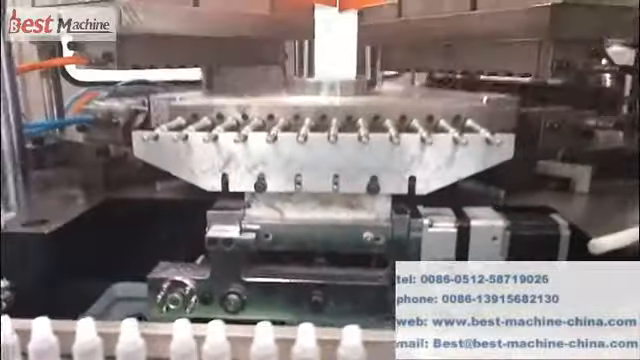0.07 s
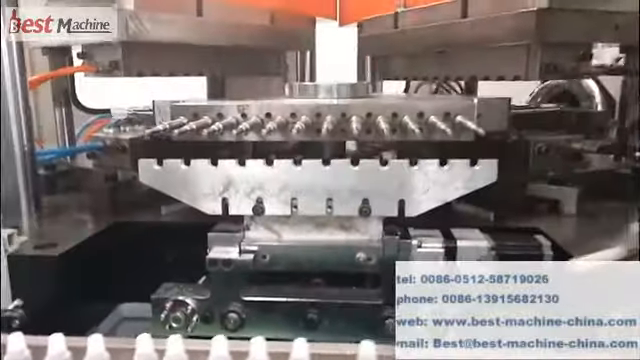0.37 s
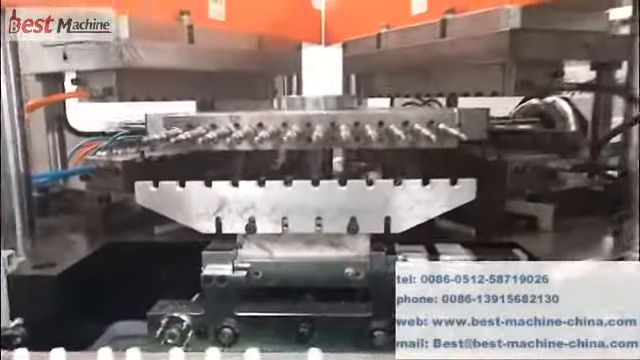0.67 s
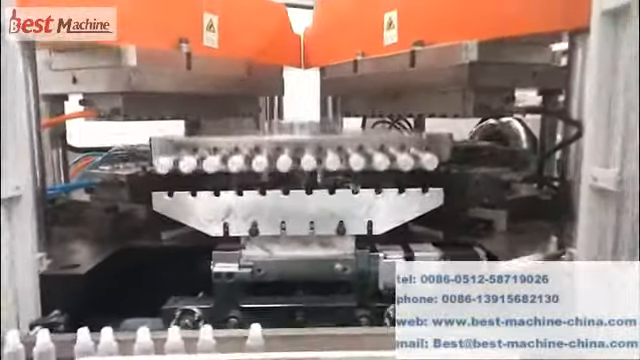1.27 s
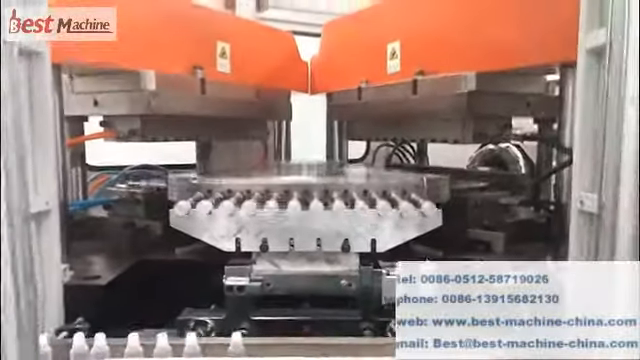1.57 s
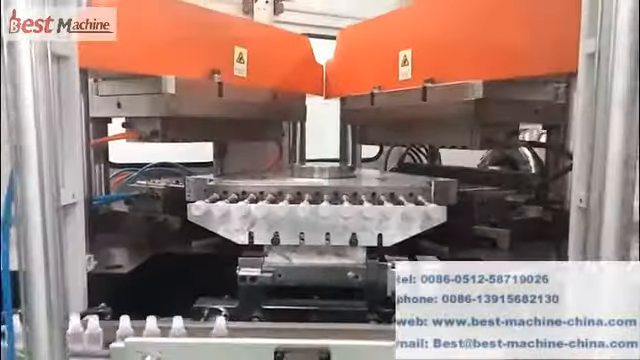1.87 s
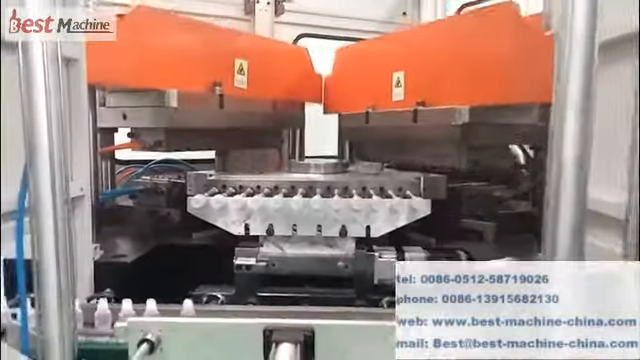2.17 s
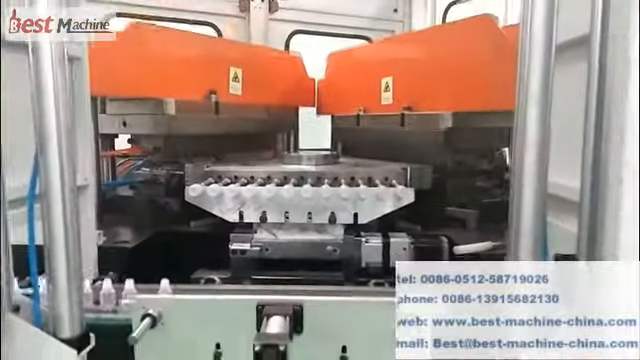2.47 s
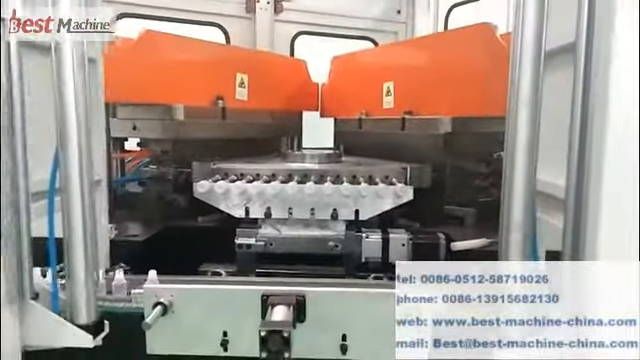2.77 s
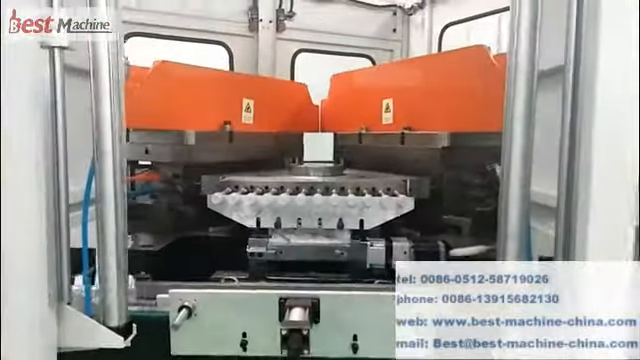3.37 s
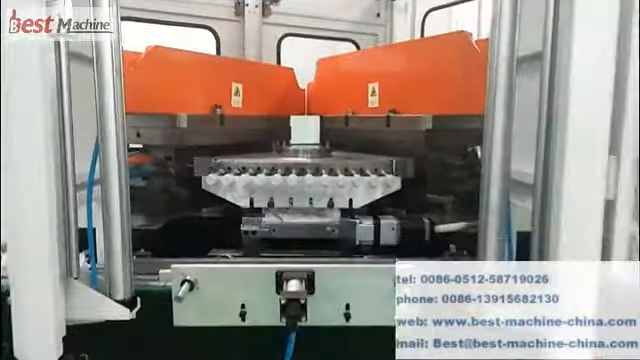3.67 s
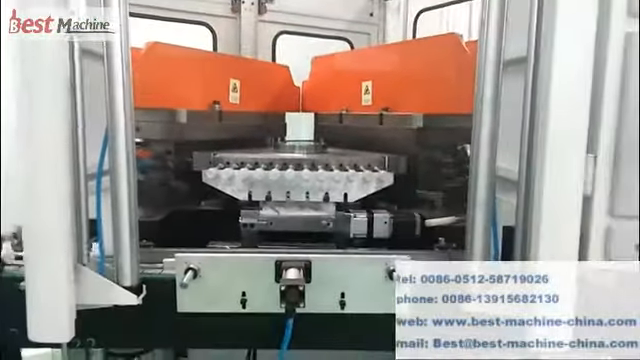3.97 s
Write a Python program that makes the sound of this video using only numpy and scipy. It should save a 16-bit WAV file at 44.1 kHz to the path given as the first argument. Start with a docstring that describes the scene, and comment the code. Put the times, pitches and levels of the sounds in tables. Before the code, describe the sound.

A molding machine cycles with thumps, steel clanks and air bursts in a rumbling factory.

```python
"""A blow molding machine cycles in a loud factory hall, heard from just in front of its open guard.
The mold carriage thuds, booms and knocks against its stops; steel parts clank and the linkage ticks.
Pneumatic valves dump air in bursts that die away in the hall, and a drive hums through one stroke.
Pump motors and the din of other machines lie underneath; the guard's panels colour it all."""
import sys
import numpy as np
from scipy import signal
from scipy.fft import rfft, irfft
from scipy.io import wavfile

SR = 44100
rng = np.random.default_rng(int(sys.argv[2]) if len(sys.argv) > 2 else 0)


def digitize_waveform(pressure):
    """Quantize a signal to 16-bit integers and store it at the path in sys.argv[1].

    Rows of a 2-D input are taken as channels; values are limited to [-1, 1].
    """
    field = np.atleast_2d(pressure).T
    bounded = np.clip(field, -1, 1)
    quanta = np.round(bounded * 32767).astype(np.int16)
    wavfile.write(sys.argv[1], SR, quanta)


N = 176400
TIME, BINS_HZ = np.arange(N) / SR, np.fft.rfftfreq(N, 1 / SR)


def carriage(rise_s=0.0095):
    """Each carriage move shakes the frame and booms a panel."""
    # moves: t/s, level/dB, hold/s, t60/s, boom f/Hz, glide/(Hz/s), boom/dB
    thuds = [(0.044, -22, 0.04, 0.34, 283, 35, 17), (0.158, -25, 0.047, 0.21, 305, -200, -7),
             (0.24, -19, 0.042, 0.24, 364.5, -550, 13.5), (0.402, -20, 0.033, 0.27, 367, -300, 2),
             (0.482, -24, 0.018, 0.2, 370, -1, 5.5), (0.878, -18.5, 0.076, 0.63, 440, 202, -8.5),
             (1, -18, .05, 0.31, 439, -600, -12), (1.042, -20, 0.11, 0.69, 349.2, -450, -3),
             (1.241, -25, 0.11, 0.57, 457, 1, 4.5), (1.804, -20, 0.058, 0.11, 385, 0, -2),
             (1.874, -18, 0.038, 0.37, 390, 306, -3), (2.362, -26.5, 0.074, 0.23, 412, 4, -7),
             (3.35, -27.5, 0.19, 0.53, 443.3, -90, 1.5), (3.851, -28.5, 0.067, 0.3, 273, 5, 0)]
    # frame spectrum: f/Hz, level/dB
    frame = [(20, -58), (60, -28), (130, -5.5), (240, 7), (430, 6), (560, -1), (750, -5.5), (1100, -5.5),
             (1800, -26), (3000, -40), (5000, -70.5), (15000, -92.5)]
    out = np.zeros(N)
    for start, db, hold, t60, hz, glide, boom_db in thuds:
        body = colour(rattle(), spectrum(frame)) + amp(boom_db) * boom(start, hz, glide)
        out += amp(db) * unit(body) * envelope(start, rise_s, hold, t60)
    return out


def boom(start_s, hz, glide_hz_per_s, glide_s=0.25, roughness=0.49, rough_hz=49):
    """A panel rings unsteadily, its pitch sliding with the speed of the carriage."""
    pitch_hz = hz + glide_hz_per_s * np.clip(TIME - start_s, 0, glide_s)
    swing = 1 + roughness * (wander(rough_hz) + 1j * wander(rough_hz))
    phase = 2 * np.pi * (np.cumsum(pitch_hz) / SR + rng.random())
    return unit((swing * np.exp(1j * phase)).real)


def mold_stops(rise_s=0.002):
    """The mold knocks against its hard stops."""
    # knocks: t/s, level/dB, hold/s, t60/s
    knocks = [(0.174, -22.5, 0.0085, 0.21), (1.787, -23, 0.013, 0.41), (2.466, -25, .02, 0.19),
              (3.261, -13.5, 0.006, 0.05), (3.279, -20, 0.011, 0.16), (3.934, -21, 0.0058, 0.16)]
    # knock spectrum: f/Hz, level/dB
    body = [(20, -42.5), (70, -36.5), (160, -3.5), (400, 6), (620, -2.5), (900, -1), (1450, -7),
            (2500, -17.5), (4000, -35.5), (5500, -68), (15000, -71.5)]
    return sum(amp(db) * colour(rattle(), spectrum(body)) * envelope(start, rise_s, hold, t60)
               for start, db, hold, t60 in knocks)


def bed_shudders(rise_s=0.0097):
    """The machine bed shudders in narrow, deep bands of noise."""
    # shudders: t/s, level/dB, hold/s, t60/s, f/Hz
    shudders = [(0.168, -45.5, .04, 0.36, 76), (0.428, -36.5, 0.21, 0.94, 128.4), (1.85, -40, .1, 0.65, 91),
                (2.326, -45, 0.074, 0.26, 64.6), (2.445, -43, .02, .25, 68.7),
                (3.27, -35, 0.014, 0.31, 133)]
    return sum(amp(db) * noise(resonance(hz, 54) ** 2) * envelope(start, rise_s, hold, t60)
               for start, db, hold, t60, hz in shudders)


def clanks():
    """Steel parts chatter against each other and ring."""
    # hits: t/s, level/dB, rise/s, hold/s, t60/s, ring/dB, clatter f/Hz, clatter/dB
    hits = [(-.01, -20.5, .007, 0.018, 1, -6, 1580, -2.5), (0.702, -25, .007, .04, 0.79, -23, 2200, -3),
            (1.06, -30, .007, 0.1, 0.6, -13, 2220, -2.5), (1.433, -25.5, .01, 0.013, 0.12, -22, 3050, 2),
            (1.628, -20.5, 0.026, 0.035, 1, -10, 2080, -14),
            (1.712, -22.5, 0.0025, 0.012, 0.22, 2, 1880, 4),
            (1.781, -23.5, 0.0081, 0.096, 0.55, -6, 1580, -14), (2.018, -22, .012, 0.031, 1, 0, 1900, -7),
            (2.327, -18, .003, 0.012, 0.07, -12, 2580, 6), (2.377, -21, .012, 0.061, 0.45, -20, 1580, -18),
            (3.725, -24, .007, 0.03, 0.98, -21, 1410, -7.5), (3.966, -17, .003, 0.022, .5, 4, 1760, 0)]
    # steel spectrum: f/Hz, level/dB
    steel = [(20, -63), (300, -4), (950, -2), (1250, -5), (1550, 1), (2100, 1), (2750, 2), (3300, -8),
             (4200, -19.5), (5000, -56.5), (7000, -79), (15000, -78)]
    # steel modes: f/Hz, width/Hz, level/dB
    modes = [(1350, 11, 5.5), (1470, 78, 1), (1835, 64, 4), (1890, 36, 4.5), (2273, 30, 3.5), (2710, 43, 2)]
    ring_gain = sum(amp(db) * resonance(hz, width) for hz, width, db in modes)
    out = np.zeros(N)
    for start, db, rise, hold, t60, ring_db, hz, clatter_db in hits:
        clatter = amp(clatter_db) * colour(rattle(), resonance(hz, 1000) ** 3)
        body = colour(rattle(), spectrum(steel))
        ring = amp(ring_db) * colour(rattle(), ring_gain)
        out += amp(db) * unit(body + clatter + ring) * envelope(start, rise, hold, t60)
    return out


def linkage(rise_s=0.0038, hold_s=0.0049, t60_s=0.092):
    """The linkage takes up its play with small bright ticks."""
    # ticks: t/s, level/dB
    ticks = [(.3, -50), (.6, -52), (.852, -53), (1.09, -56), (1.16, -53), (1.225, -53), (1.32, -56.5),
             (1.413, -53.5), (1.525, -57), (1.618, -58), (2.26, -52.5)]
    # tick spectrum: f/Hz, level/dB
    tick = [(20, -55.5), (2500, -14), (4500, 2), (5600, 2), (7400, -35.5), (8500, -43.5), (15000, -59.5)]
    level = sum(amp(db) * envelope(start, rise_s, hold_s, t60_s) for start, db in ticks)
    return level * colour(rattle(), spectrum(tick))


def exhausts(sputter_db=3, sputter_hz=16, hiss_t60_ratio=0.42, shelf_from_hz=3100, shelf_full_hz=3760):
    """Air roars out through a pipe and silencer; its hiss dies first."""
    # bursts: t/s, level/dB, rise/s, hold/s, t60/s, treble shelf/dB, hiss/dB
    bursts = [(0.177, -19, 0.0039, 0.011, 0.29, -9, -25), (2.409, -19.5, 0.07, 0.12, 1.02, -11.5, -25.5),
              (2.673, -33, 0.013, 0.039, 0.86, -16, -16.5), (3.264, -16.5, 0.012, 0.17, 1.42, -6, -30),
              (3.87, -30, .008, 0.017, 1.8, -11, -27)]
    # silencer spectrum: f/Hz, level/dB
    silencer = [(20, -58.5), (400, -15), (1200, -21.5), (1700, -9.5), (2300, 0.5), (2850, -2), (3300, -3.5),
                (4150, -1), (4400, -17), (4900, -24.5), (6000, -37), (7800, -69.5), (9500, -73),
                (15000, -76)]
    # pipe resonances: f/Hz, width/Hz, gain/dB
    modes = [(2120, 38, 2), (2154, 24, 7), (2320, 52, -2), (2300, 35, 5.5), (2635, 100, 7), (2900, 80, 3.5),
             (3150, 39, 4.5), (3286, 100, 5), (3530, 47, 8.5), (3640, 69, 2.5), (3890, 51, 6),
             (4056, 98, 4)]
    # hiss spectrum: f/Hz, level/dB
    hiss_band = [(20, -60), (3500, -9), (4600, 15), (6000, 13.5), (7700, 2.5), (9200, -35), (15000, -31)]
    pipe = spectrum(silencer) * amp(sum(db * resonance(hz, width) for hz, width, db in modes))
    out = np.zeros(N)
    for start, db, rise, hold, t60, shelf_db, hiss_db in bursts:
        shelf = spectrum([(shelf_from_hz, 0), (shelf_full_hz, shelf_db)])
        roar = noise(pipe * shelf) * envelope(start, rise, hold, t60)
        hiss = amp(hiss_db + sputter_db * wander(sputter_hz)) * noise(spectrum(hiss_band))
        out += amp(db) * (roar + hiss * envelope(start, rise, hold, t60 * hiss_t60_ratio))
    return out


def valve_jets(whistle_hz=9500, width_hz=230, sputter_db=2, sputter_hz=35):
    """Thin jets sputter and whistle straight from the valve."""
    # jets: t/s, level/dB, rise/s, hold/s, t60/s, whistle/dB
    jets = [(0.166, -59, .008, 0.012, 0.1, -28), (2.353, -34, 0.044, 0.074, 0.13, -25),
            (3.029, -58.5, 0.01, 0.031, 0.4, 1), (3.16, -63, .015, 0.057, .1, -25),
            (3.26, -41.5, 0.018, 0.013, 0.096, -40), (3.396, -61, 0.011, 0.022, 0.078, 10),
            (3.867, -48.5, 0.0076, 0.012, 0.042, -28)]
    # jet spectrum: f/Hz, level/dB
    jet_band = [(20, -57), (3000, 4), (4600, 7.5), (5300, -2.5), (7500, -0.5), (9000, -12.5), (10500, -24),
                (12100, -4), (14100, 0), (14700, -16)]
    out = np.zeros(N)
    for start, db, rise, hold, t60, whistle_db in jets:
        rush = noise(spectrum(jet_band))
        whistle = amp(whistle_db) * noise(resonance(whistle_hz, width_hz))
        level = amp(db + sputter_db * wander(sputter_hz))
        out += level * unit(rush + whistle) * envelope(start, rise, hold, t60)
    return out


def drive(waver_hz=1.4, waver_db=0.16):
    """A nearly pure hum swells as the drive runs its stroke."""
    # stroke: t/s, f/Hz, level/dB
    stroke = [(2.12, 298, -45), (2.23, 305.8, -28.5), (2.29, 307, -17.5), (2.34, 309, -30),
              (2.55, 308, -23.5), (2.721, 309, -19), (2.916, 309, -19), (2.96, 304.8, -28),
              (3.02, 318.7, -23.5), (3.07, 313, -34.5), (3.18, 313.3, -33), (3.27, 320, -68)]
    times, hz, db = np.transpose(stroke)
    pitch_hz = np.interp(TIME, times, hz) + waver_hz * wander(rate_hz=28)
    level_db = np.interp(TIME, times, db, left=-120, right=-120) - waver_db * wander(rate_hz=6.2)
    return tone(level_db, pitch_hz)


def pumps(waver_db=3, waver_hz=6):
    """Pump motors hum in faint wavering lines."""
    # motor lines: f/Hz, level/dB
    lines = [(121, -53.5), (470, -44)]
    return sum(tone(db + waver_db * wander(rate_hz=2.5), hz + waver_hz * wander(rate_hz=8))
               for hz, db in lines)


def din(split_hz=700, throb_db=0.1, throb_hz=25, flutter_db=0.8, flutter_hz=30):
    """Other machines: a rumble under a fluttering clatter."""
    # hall spectrum: f/Hz, level/dB
    hall_band = [(20, -42), (45, -26.5), (85, -19.5), (125, -8), (210, -2.5), (380, 3.5), (620, -2.5),
                 (1150, -8), (1700, -5), (2700, -2), (3300, -12), (4200, -22), (5000, -37.5), (6500, -71),
                 (9000, -96.5), (15000, -69)]
    # din contour: t/s, level/dB
    contour = [(0, -20), (.3, -20), (.62, -22.5), (.8, -22), (1.2, -21), (1.42, -23), (1.6, -26),
               (1.75, -30.5), (2, -23), (2.3, -21.5), (2.8, -20.5), (3.1, -25.5), (3.25, -25), (3.5, -20.5),
               (3.85, -25.5), (4, -24)]
    hall = noise(spectrum(hall_band))
    lows = irfft(rfft(hall) / (1 + (BINS_HZ / split_hz) ** 4), N)
    rumble = lows * amp(-throb_db * wander(throb_hz))
    clatter = (hall - lows) * amp(flutter_db * wander(flutter_hz))
    return (rumble + clatter) * amp(np.interp(TIME, *np.transpose(contour)))


def guard(x):
    """The guard's panels lift or cut narrow bands."""
    # panel resonances: f/Hz, width/Hz, gain/dB
    modes = [(122, 17, 1), (242.6, 25, -1), (348, 8.4, -0.5), (436, 120, 0.5), (590, 7.6, 4.5),
             (780, 31, 0), (1380, 55, 2.5), (1595, 37, 3), (2620, 27, -6.5), (2900, 62, -1)]
    return x + sum((amp(db) - 1) * signal.lfilter(*signal.iirpeak(hz, hz / width, fs=SR), x)
                   for hz, width, db in modes)


def amp(db):
    """dB to gain."""
    return 10 ** (np.asarray(db) / 20)


def unit(x):
    """Scale to unit rms."""
    return x / np.sqrt(np.mean(x ** 2) + 1e-20)


def spectrum(points):
    """Gain per bin from (f/Hz, level/dB) points."""
    hz, db = np.transpose(points)
    return amp(np.interp(np.log(BINS_HZ + 1), np.log(hz), db))


def resonance(hz, width_hz):
    """Gain per bin of one peak."""
    return 1 / (1 + ((BINS_HZ - hz) / (0.51 * width_hz)) ** 2)


def colour(x, gain):
    """Filter, then scale to unit rms."""
    return unit(irfft(rfft(x) * gain, N))


def noise(gain):
    """Coloured noise, unit rms."""
    return colour(rng.standard_normal(N), gain)


def wander(rate_hz):
    """Smooth random motion, unit rms."""
    return noise(np.exp(-(BINS_HZ / rate_hz) ** 2))


def tone(rms_db, pitch_hz):
    """Sine along a pitch curve."""
    return np.sqrt(2) * amp(rms_db) * np.sin(2 * np.pi * np.cumsum(pitch_hz) / SR)


def rattle(hits_per_s=6000, spread_db=0.5):
    """Dense small impacts of uneven size."""
    size = amp(spread_db * np.minimum(rng.exponential(1, N), 4))
    return size * rng.choice([-1., 1.], N) * (rng.random(N) < hits_per_s / SR)


def envelope(start_s, rise_s, hold_s, t60_s):
    """Rise, hold, then die away in the hall."""
    age_s = TIME - start_s
    return np.clip(age_s / rise_s, 0, 1) * amp(-60 * np.maximum(age_s - rise_s - hold_s, 0) / t60_s)


def scene():
    """All sources in mono, coloured by the guard."""
    background = din() + pumps()
    mechanics = carriage() + mold_stops() + bed_shudders() + clanks() + linkage()
    air = exhausts() + valve_jets()
    return guard(background + mechanics + air + drive())[None]


def record(dry):
    """Steep low-pass at 14.4 kHz."""
    taps = signal.firwin(511, 14400, window=("kaiser", 9), fs=SR)
    return signal.oaconvolve(dry, taps[None], "same")


dry = scene()
out = record(dry)
digitize_waveform(out)
```